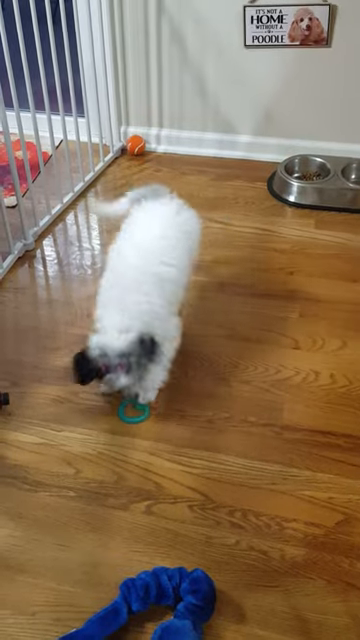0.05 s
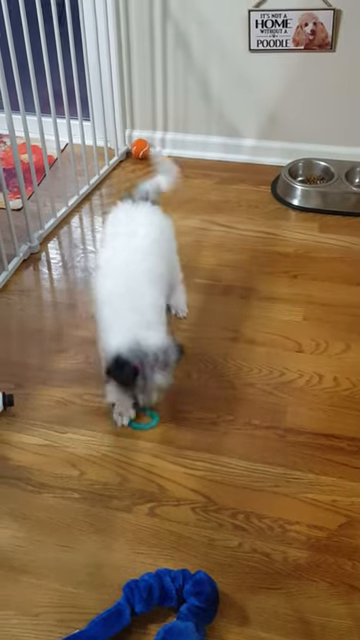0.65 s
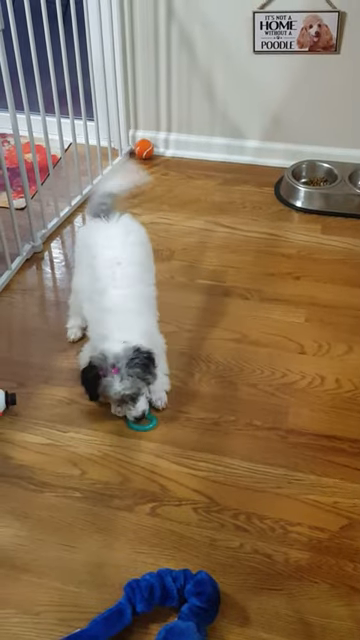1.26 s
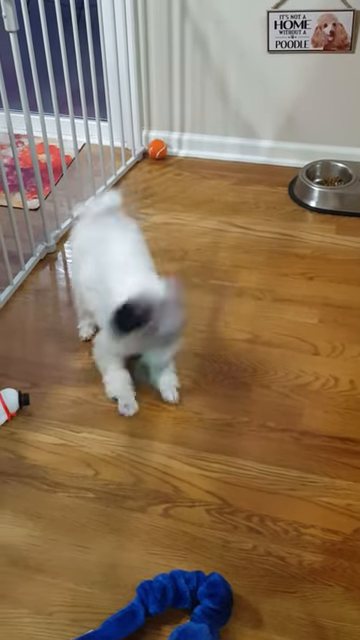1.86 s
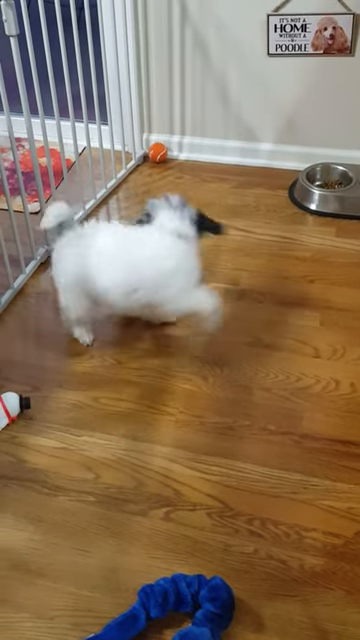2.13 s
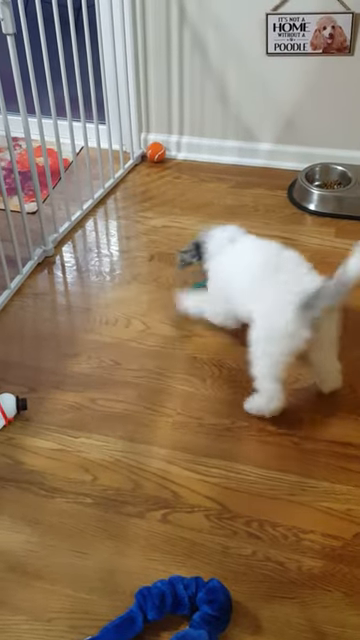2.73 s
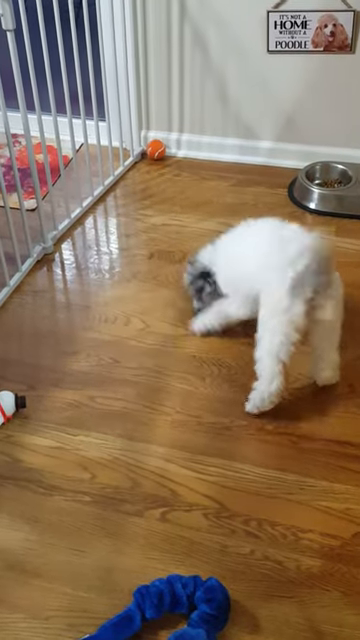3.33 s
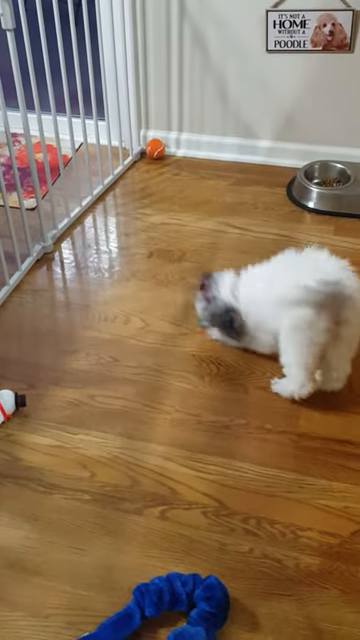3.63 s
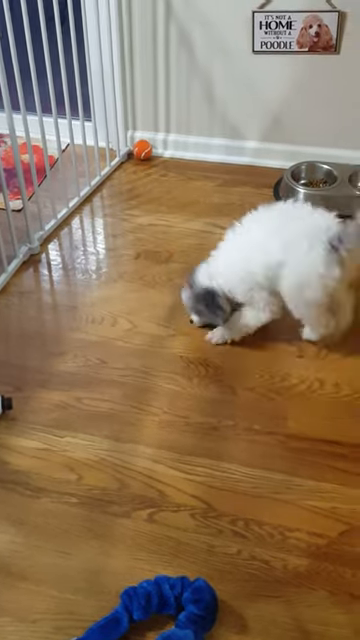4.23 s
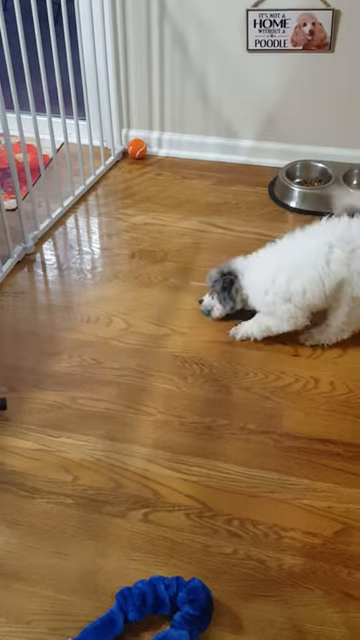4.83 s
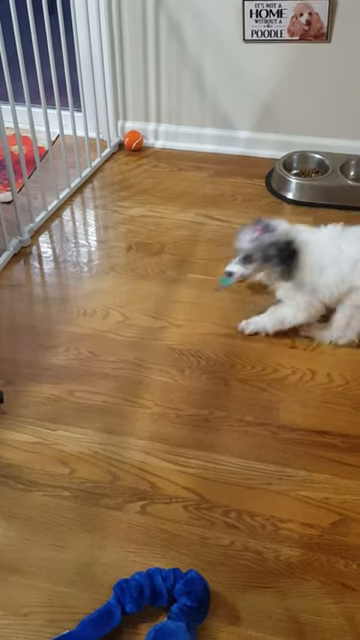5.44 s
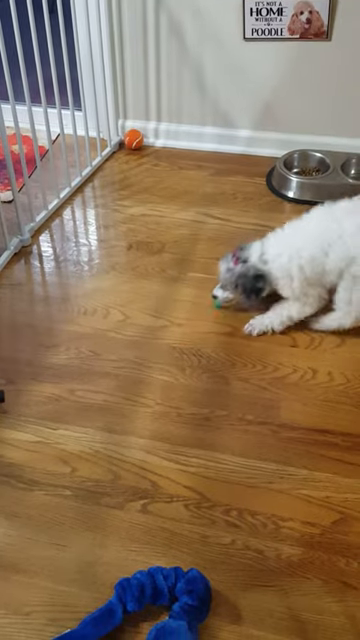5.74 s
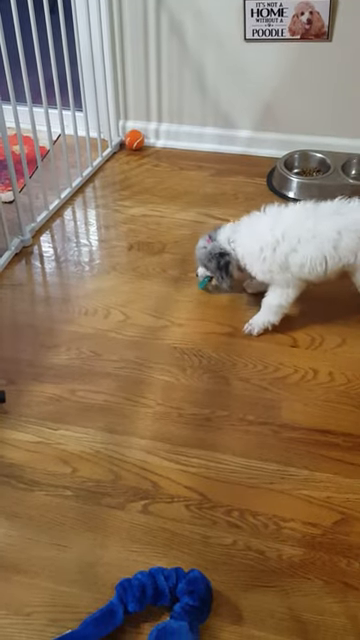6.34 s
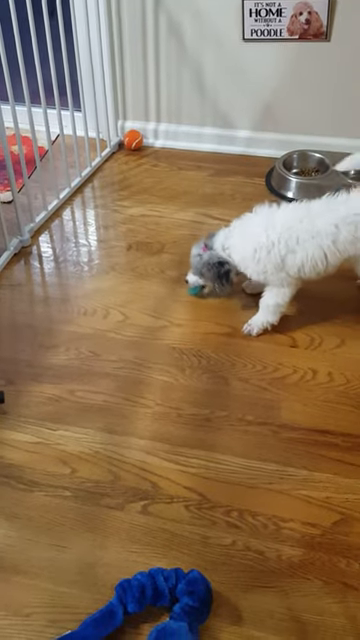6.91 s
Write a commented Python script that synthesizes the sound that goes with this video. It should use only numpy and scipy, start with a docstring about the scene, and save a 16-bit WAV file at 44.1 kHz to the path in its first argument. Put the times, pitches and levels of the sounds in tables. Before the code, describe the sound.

From the start, a steady hiss like a running tap covers a low household hum in a bare, slightly reverberant room. A puppy's paws scuff and thud softly on a hardwood floor, with a short skid and claw tick near 0.5 seconds and a low thump of the boards near 0.7. At 2.4 seconds the puppy pounces on a small ring toy: three quick, booming, woody knocks, the loudest event. The hiss dies away from 2.7 seconds, leaving a faint appliance hum. Irregular soft footfalls and light claw ticks continue, with smaller knocks around 2.9, 3.4, 4.2 and 5.7 seconds and faint paw slides near 4.9 and 5.3. The puppy's teeth draw tiny creaks from the toy: a sharp click at 4.7 seconds, then brief ones around 5.6, 6.4 and 6.9. Everything is heard through a phone microphone.

```python
"""A puppy plays with a ring toy on a hardwood floor, heard through a phone's two microphone ports.
At first a hiss like a running tap covers the house's hum, while paws skid and set the boards booming.
At 2.4 s the puppy pounces: toy and claws excite the floor's modes and the bare room reverberates.
The hiss dies away from 2.7 s, leaving an appliance's hum as the puppy carries the toy off.
From 4.7 s it chews, and the ring creaks under the drag of its teeth."""
import sys
import numpy as np
from scipy import signal
from scipy.fft import rfft, irfft
from scipy.io import wavfile

SR = 44100
rng = np.random.default_rng(int(sys.argv[2]) if len(sys.argv) > 2 else 0)


def store_wav(level_fs):
    """Save 16-bit WAV to argv[1]."""
    pcm = np.round(np.clip(np.atleast_2d(level_fs), -1, 1) * 32767)
    wavfile.write(sys.argv[1], SR, pcm.T.astype(np.int16))


N = 307377
T = np.arange(N) / SR

# spectra of the quiet house, the tap and the joists: (frequency [Hz], relative level [dB])
HOUSE_SPECTRUM = [(20, -12), (50, -2), (80, 1.5), (120, 3.5), (300, 2.5), (500, -4.5), (900, -8.5),
                  (1150, -7), (1330, -4.5), (1600, -6.5), (3000, -14.5), (7000, -18), (15000, -18)]
WATER_SPECTRUM = [(300, -10), (1000, -21.5), (1550, -8), (2050, 3), (2350, -1), (2700, 3), (3300, -3.5),
                  (3900, 0.5), (4500, -2.5), (5400, 2.5), (6200, -0.5), (7000, 1.5), (9000, 1.5),
                  (15000, -5.5)]
JOIST_SPECTRUM = [(25, -10), (45, -6), (85, 6.5), (150, 3), (260, -27), (800, -65)]
# the puppy's weight shaking the joists: (time [s], duration [s], level [dB])
WEIGHT_SHIFTS = [(0.662, 0.13, -42.5), (.76, 0.52, -54), (1.69, .12, -60), (2.4, 0.3, -46.5)]
# floor modes, the lowest two in the subfloor: (frequency [Hz], relative level [dB], t60 [s])
FLOOR_MODES = [(167.7, -9.5, 0.12), (193.2, 2, 0.071), (286.6, -6.5, 0.044), (311, 2.5, 0.057),
               (364.9, -1, 0.062), (488, -9.5, 0.047)]
# modes of wood and toy under a hard contact: (frequency [Hz], relative level [dB], t60 [s])
CLACK_MODES = [(692, 17, 0.033), (780, 5.5, 0.051), (970, -29, .035), (1040, -17, .03), (1198, 7.5, 0.08),
               (1490, 6, 0.052), (2200, -9, 0.031), (2440, 4, 0.024)]
# contact noise of a soft pad, a hard blow and its bright tick: (frequency [Hz], relative level [dB])
PAD_SPECTRUM = [(70, -19), (160, 1.5), (450, -3), (900, -3.5), (1700, -6), (3000, -14), (8000, -27.5)]
CRACK_SPECTRUM = [(70, -44), (250, -1), (400, 2), (620, 0.5), (800, 0), (1100, -2), (1500, 0), (2300, -1),
                  (3200, -17), (8000, -25.5)]
TICK_SPECTRUM = [(1200, -19), (2400, -5), (3100, 19), (4100, 11), (4800, 1.5), (7500, 1.5), (14000, -27)]
# paws and fur sliding on varnish: (time [s], duration [s], level [dB], treble slope [dB/octave])
PAW_SKIDS = [(0, 0.054, -51, -9), (0.517, 0.053, -44, -2.5), (4.853, 0.19, -56, -3), (5.307, 0.17, -54, 1),
             (5.431, 0.027, -52, 4), (6.333, 0.046, -56.5, -4.5)]
# lone claw ticks: (time [s], centre frequency [Hz], level [dB])
CLAW_TICKS = [(0.541, 3920, -45), (0.559, 5400, -56), (3.392, 10600, -50.5), (4.355, 3440, -58),
              (4.748, 6100, -57.5), (5.524, 9000, -53.5), (5.630, 10000, -56.5), (6.432, 6000, -58.5)]
# teeth on the ring: (time [s], duration [s], centre frequency [Hz], bandwidth [Hz], peak level [dB])
TOY_CREAKS = [(4.69, 0.003, 1550, 890, -35.5), (5.583, 0.038, 2000, 614, -44.5),
              (6.361, 0.017, 2400, 300, -59), (6.906, 0.014, 1710, 350, -43.5),
              (6.937, .03, 1790, 196, -50)]
# firm footfalls, in relative levels: (time [s], thud [dB], slap [dB])
FOOTFALLS = [(0.09, -36, -47.5), (0.673, -27.5, -38), (0.922, -38.5, -51), (1.101, -30, -60),
             (1.288, -38, -62), (2.151, -36.5, -45), (2.38, -29, -46), (2.427, -13, -27.5),
             (2.69, -25.5, -45), (3.012, -33, -47), (3.064, -32.5, -39.5), (3.086, -31.5, -45),
             (3.585, -38.5, -52), (3.645, -33.5, -50), (4.185, -31, -44.5), (4.233, -31, -48),
             (4.406, -27.5, -44.5), (4.506, -37.5, -50), (4.75, -30.5, -43.5), (5.455, -43, -50),
             (5.944, -35.5, -59), (5.991, -33.5, -51.5), (6.924, -32.5, -57)]
# blows of toy and claws, in relative levels: (time [s], clack [dB], thud [dB], tick [dB])
HARD_BLOWS = [(2.412, -20, -13, -28.5), (2.484, -26.5, -22, -54), (2.555, -24.5, -27.5, -27.5),
              (2.908, -42, -27.5, -50.5), (3.392, -41.5, -38, -50.5), (4.247, -33.5, -27, -47),
              (5.722, -32, -30.5, -60), (6.423, -46.5, -33.5, -65)]
# early reflections from walls and furniture: (delay [s], gain [ratio])
REFLECTIONS = [(.0037, 0.53), (.0068, 0.42), (.0105, 0.2), (.018, 0.42)]
# standing waves of the room: (frequency [Hz], peak against the direct sound [dB], t60 [s])
ROOM_MODES = [(186.6, -8, 0.35), (301, -20, 0.94), (360, -17, 1), (498, 4, 0.53), (775, 5, 0.94),
              (980, 3, 0.45), (1340, 1, 0.62), (2130, -8, 0.56)]
# bands of the reverberant tail: (frequency [Hz], t60 [s], level against the direct sound [dB])
TAIL_BANDS = [(100, 0.53, -3), (313, 0.67, -4.5), (700, 0.47, 7), (1458, 0.71, 3), (3500, 0.61, 0.5),
              (7000, 0.8, 1), (14000, .35, -12)]
# response of the microphone ports: (frequency [Hz], left gain [dB], right gain [dB])
PORT_RESPONSE = [(104.4, 1.5, 2.5), (332, 1, 4), (556, 1, 3), (970, 1.5, 1.5), (1500, -3.5, 3),
                 (2160, -4, 2), (3400, -3, 1), (5140, -1, 4.5), (5970, 4.5, 3), (6290, 1.5, -4.5),
                 (7000, 10, 5), (7320, 5, -2.5), (8050, -4.5, -14.5), (9800, -18, -8.5), (11400, 0, 0.5),
                 (12350, 4.5, 0), (14400, -6, -17), (15500, -10, -25)]


def undb(db):
    """Decibels to amplitude ratio."""
    return 10 ** (np.asarray(db) / 20)


def unit(x):
    """Normalise to rms 1."""
    return x / np.sqrt(np.mean(x ** 2))


def unit_onset(x):
    """Normalise an impact to rms 1 over its first 10 ms."""
    return x / np.sqrt(np.mean(x[:SR // 100] ** 2))


def colour(x, points, column=1):
    """Minimum-phase filtering: folding the cepstrum makes a causal response from (Hz, dB) points."""
    n = 4096
    table = np.array(points, float)
    hz = np.maximum(np.arange(n // 2 + 1) * SR / n, 1)
    db = np.interp(np.log(hz), np.log(table[:, 0]), table[:, column])
    cepstrum = irfft(np.log(undb(db)))
    cepstrum[1:n // 2] *= 2
    cepstrum[n // 2 + 1:] = 0
    response = irfft(np.exp(rfft(cepstrum))).reshape((1,) * (x.ndim - 1) + (n,))
    return signal.oaconvolve(x, response, axes=-1)[..., :x.shape[-1]]


def add(track, time, sound):
    """Superpose a sound on a track at a time in seconds."""
    i = max(int(time * SR), 0)
    part = sound[..., :max(N - i, 0)]
    track[..., i:i + part.shape[-1]] += part


def swell(length, crest):
    """A smooth envelope that peaks at the fraction crest of its length."""
    progress = np.linspace(0, 1, max(int(length * SR), 8))
    return np.sin(np.pi / 2 * np.interp(progress, [0, crest, 1], [0, 1, 0]))


def drift(knots):
    """Slow modulation: straight lines between evenly spaced random values."""
    return np.interp(T, np.linspace(0, T[-1], knots), rng.standard_normal(knots))


def diffuse(n, corner_hz=520, bass_coherence=0.98):
    """A diffuse field is coherent at two close ports only for long wavelengths."""
    hz = np.arange(n // 2 + 1) * SR / n
    coherence = bass_coherence / (1 + (hz / corner_hz) ** 4)
    mid, side = rfft(rng.standard_normal((2, n)))
    mid, side = mid * np.sqrt((1 + coherence) / 2), side * np.sqrt((1 - coherence) / 2)
    return irfft(np.array([mid + side, mid - side]), n)


def house(air_db=-54, hum_hz=80.2, hum_db=-66, whine_hz=1337, whine_db=-73.5, waver_db=2.5):
    """Diffuse air noise, with an appliance's hum and whine under one slow amplitude modulation."""
    waver = waver_db * drift(40)
    hum = undb(hum_db + waver) * unit(np.sin(2 * np.pi * hum_hz * T))
    whine = undb(whine_db + waver) * unit(np.sin(2 * np.pi * whine_hz * T))
    air = undb(air_db) * unit(colour(diffuse(N, bass_coherence=0.92), HOUSE_SPECTRUM))
    return air + hum + whine


def tap(level_db=-46.5, flutter_db=0.44, shut_s=2.717, fade_db_per_s=72):
    """Running water radiates broadband noise, which decays exponentially once the tap is shut."""
    flutter = flutter_db * drift(200)
    closing = fade_db_per_s * np.maximum(T - shut_s, 0)
    return undb(level_db + flutter - closing) * unit(colour(diffuse(N), WATER_SPECTRUM))


def joists():
    """Forced vibration: the whole floor rumbles when the puppy throws its weight."""
    load = np.zeros(N)
    for time, length, db in WEIGHT_SHIFTS:
        add(load, time, undb(db) * swell(length, crest=0.22))
    return load * unit(colour(rng.standard_normal(N), JOIST_SPECTRUM))


def tail(t, build_s=0.01):
    """Reverberation: a diffuse field builds up, then decays at its own rate in each band."""
    hz = np.arange(len(t) // 2 + 1) * SR / len(t)
    centres, t60, db = np.transpose(TAIL_BANDS)
    bands = np.array([np.interp(np.log(hz + 1), np.log(centres), row) for row in np.eye(len(centres))])
    fades = np.exp(-np.log(1000) * t / t60[:, None]) * (1 - np.exp(-t / build_s))
    fades *= (undb(db) / np.linalg.norm(fades, axis=1))[:, None]
    band_noise = irfft(rfft(diffuse(len(t)))[:, None] * bands, len(t))
    return np.sum(band_noise * fades, axis=1)


def room(x, reflect_above_hz=550):
    """Convolution with the room: direct sound, early reflections, standing waves and reverberation."""
    t = T[:SR * 2 // 3]
    response = np.zeros((2, len(t)))
    for k, (delay, gain) in enumerate(REFLECTIONS):
        # reflections come from alternate sides and reach one port first
        lag = (-1) ** k * rng.integers(3, 13)
        response[0, int(delay * SR) - lag] += gain
        response[1, int(delay * SR) + lag] += gain
    # furniture reflects only the short waves
    response = signal.sosfilt(signal.butter(2, reflect_above_hz, "high", fs=SR, output="sos"), response)
    for hz, db, t60 in ROOM_MODES:
        decay = np.log(1000) / t60
        response += undb(db) * 2 * decay / SR * np.cos(2 * np.pi * hz * t) * np.exp(-decay * t)
    response[:, 0] += 1  # direct sound
    out = signal.oaconvolve(x[None], response, axes=1)[:, :N]
    # the tail changes as the puppy moves about
    hop = len(t)
    for start in range(-hop, N, hop):
        i = np.arange(max(start, 0), min(start + 2 * hop, N))
        crossfade = 1 - np.abs(i - start - hop) / hop
        add(out, i[0] / SR, signal.fftconvolve((x[i] * crossfade)[None], tail(t), axes=1))
    return out


def struck_modes(modes, gains, detune, press_s):
    """Damped modes build up over the contact time; each spot on the floor shifts them a little."""
    hz, db, t60 = np.transpose(modes)[:, :, None]
    shift, scatter_db = rng.standard_normal((2, len(modes), 1))
    t = T[:SR // 8]
    waves = np.sin(2 * np.pi * hz * (1 + detune * shift) * t) * np.exp(-np.log(1000) * t / t60)
    motion = -np.sum(gains * undb(db + scatter_db) * waves, axis=0) * (1 - np.exp(-t / press_s))
    # a narrow board radiates little deep bass
    return signal.sosfilt(signal.butter(3, 105, "high", fs=SR, output="sos"), motion)


def boom(thud_db, press_s, subfloor_db=-9):
    """Modal response of the floor: a touch drives the boards and, more weakly, the subfloor."""
    in_subfloor = np.array(FLOOR_MODES)[:, :1] < 230
    gains = undb(thud_db + subfloor_db * in_subfloor)
    return struck_modes(FLOOR_MODES, gains, detune=0.02, press_s=press_s)


def contact_noise(spectrum, fade_s):
    """A quick run of tiny impacts is broadband: decaying noise, whitened and then coloured."""
    t = T[:SR // 10]
    fade = np.exp(-np.log(1000) * t / fade_s)
    rattle = rfft(rng.standard_normal(len(t)) * fade)
    whitened = irfft(rattle / np.abs(rattle), len(t)) * fade ** 0.25
    return unit_onset(colour(whitened, spectrum))


def paw(thud_db, slap_db, pad_db=-9):
    """A compliant pad spreads its force over milliseconds, so the boards thud with only a faint slap."""
    thud = boom(thud_db, press_s=0.0079)
    pad = contact_noise(PAD_SPECTRUM, fade_s=0.05)
    rise = 1 - np.exp(-T[:len(pad)] / 0.011)
    slap = undb(slap_db + pad_db) * unit_onset(pad * rise)
    return thud + np.pad(slap, (0, len(thud) - len(slap)))


def shuffle(touches_per_s=4, spread_db=1):
    """Weak impulses at irregular times excite the floor: the puppy never stands still."""
    out = np.zeros(N)
    for k in range(int(touches_per_s * T[-1])):
        strength = undb(spread_db * rng.standard_normal())
        time = (k + rng.random()) / touches_per_s
        add(out, time, strength * paw(thud_db=-53, slap_db=-60.5))
    return out


def skids(grain_db=5):
    """Sliding friction: fur and pads catch and release in countless tiny slips."""
    out = np.zeros(N)
    for time, length, db, slope in PAW_SKIDS:
        push = swell(length, crest=0.68)
        slips = rng.standard_normal(len(push)) * undb(grain_db * rng.standard_normal(len(push)))
        rub = colour(slips, [(500, -25), (1800, 0), (14400, 3 * slope)])
        add(out, time, undb(db) * push * unit(rub))
    return out


def claws():
    """A brief, stiff contact puts its energy in the treble: single nails tick on the varnish."""
    out = np.zeros(N)
    for time, hz, db in CLAW_TICKS:
        spectrum = [(hz / 4, -24), (hz, 0), (hz * 3, -14)]
        add(out, time, undb(db) * contact_noise(spectrum, fade_s=0.012))
    return out


def creaks():
    """Friction drives a damped resonance as the teeth drag on the ring."""
    out = np.zeros(N)
    for time, length, hz, width, db in TOY_CREAKS:
        drag = swell(length, crest=0.098)
        slips = np.pad(drag * rng.standard_normal(len(drag)), (0, SR // 20))
        resonance = signal.butter(2, [hz - width / 2, hz + width / 2], "band", fs=SR, output="sos")
        tone = signal.sosfilt(resonance, slips)
        add(out, time, undb(db) * tone / np.abs(tone).max())
    return out


def steps(settle_s=0.04, settle_db=-10):
    """Each footfall is a double impact: the pad lands, then the toes settle more softly."""
    out = np.zeros(N)
    for time, thud, slap in FOOTFALLS:
        add(out, time, paw(thud, slap))
        add(out, time + settle_s, undb(settle_db) * paw(thud, slap))
    return out


def knocks(thud_db=5.5, ring_db=-20, crack_db=-6, tick_db=-4):
    """A hard impact excites a wide band: booming boards, a woody clack and a bright tick."""
    out = np.zeros(N)
    for time, clack, thud, tick in HARD_BLOWS:
        add(out, time, boom(thud + thud_db, press_s=0.0052))
        add(out, time, struck_modes(CLACK_MODES, undb(clack + ring_db), detune=0.0038, press_s=0.0012))
        add(out, time, undb(clack + crack_db) * contact_noise(CRACK_SPECTRUM, fade_s=0.07))
        add(out, time, undb(tick + tick_db) * contact_noise(TICK_SPECTRUM, fade_s=0.045))
    return out


def scene():
    """Superposition: the sounds of the house, and the puppy's play reverberating in the room."""
    background = joists() + tap() + house()
    return background + room(knocks() + steps() + claws() + skids() + creaks() + shuffle())


def record(dry, cutoff_hz=15600):
    """Port resonances colour each channel, and the phone's steep low-pass limits the bandwidth."""
    heard = np.array([colour(dry[k], PORT_RESPONSE, column=k + 1) for k in range(2)])
    return signal.sosfiltfilt(signal.ellip(8, .1, 60, cutoff_hz, fs=SR, output="sos"), heard)


dry = scene()
out = record(dry)
store_wav(out)
```